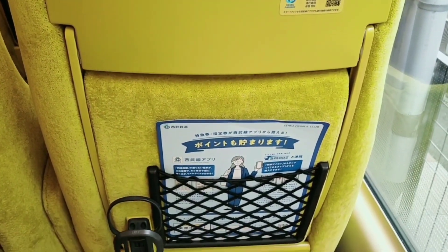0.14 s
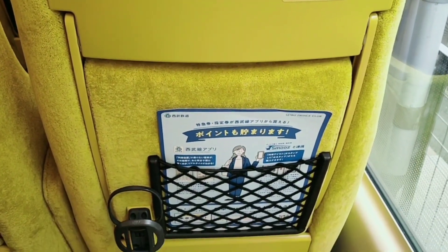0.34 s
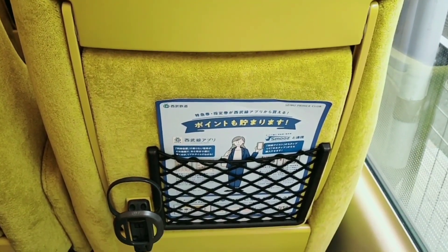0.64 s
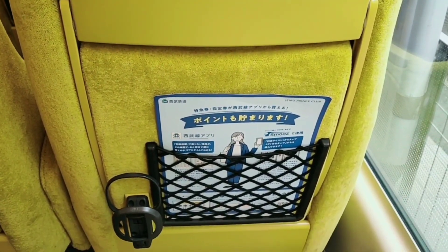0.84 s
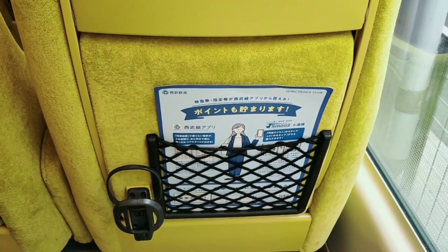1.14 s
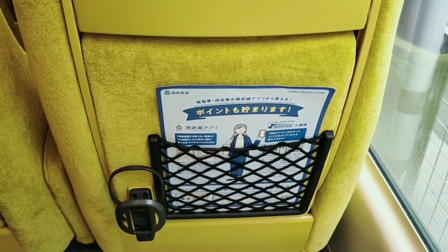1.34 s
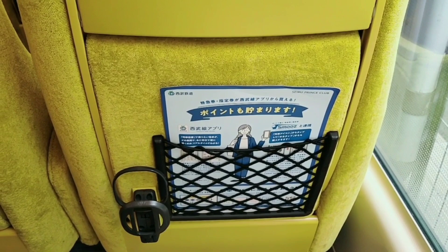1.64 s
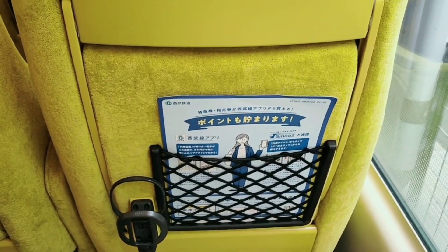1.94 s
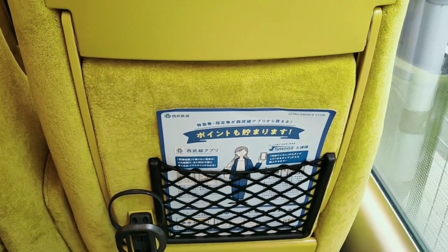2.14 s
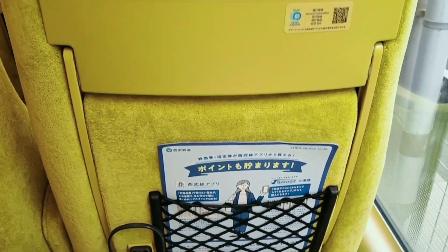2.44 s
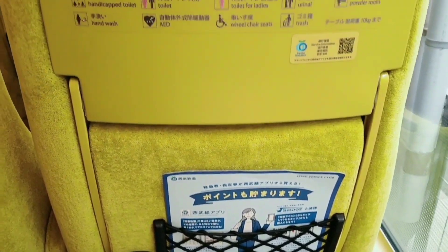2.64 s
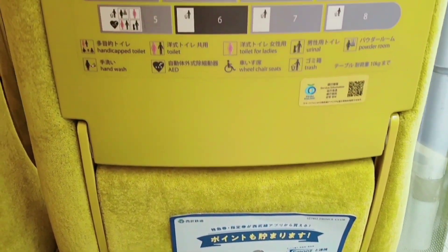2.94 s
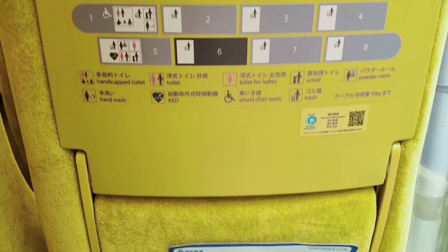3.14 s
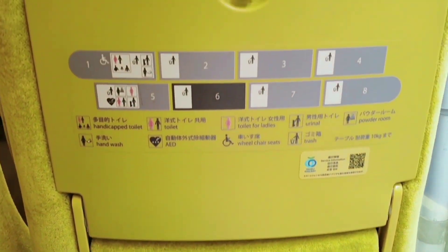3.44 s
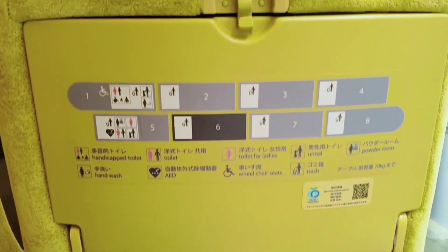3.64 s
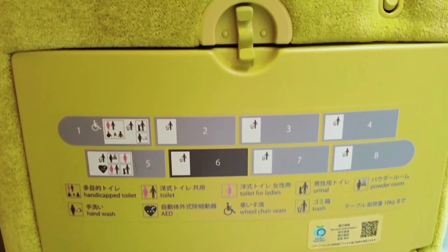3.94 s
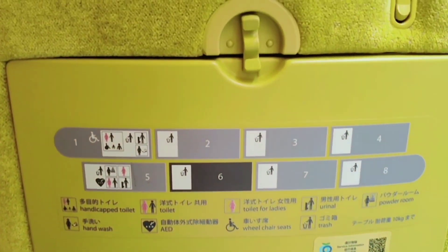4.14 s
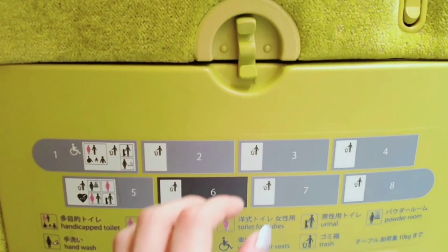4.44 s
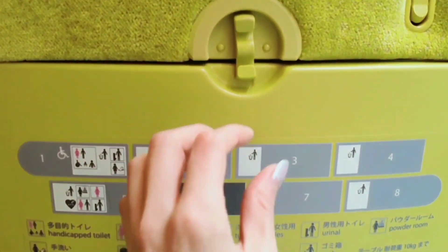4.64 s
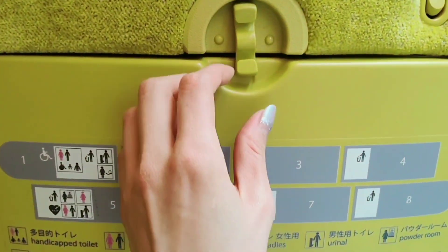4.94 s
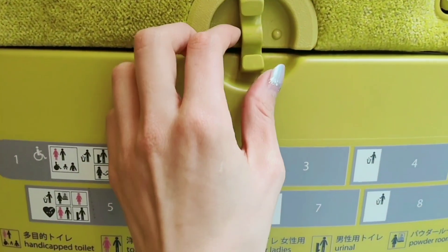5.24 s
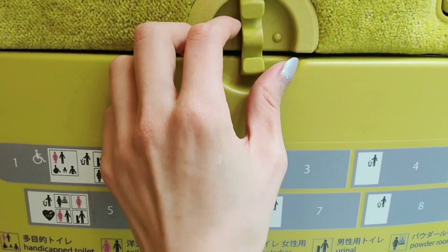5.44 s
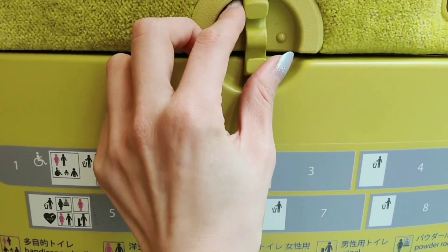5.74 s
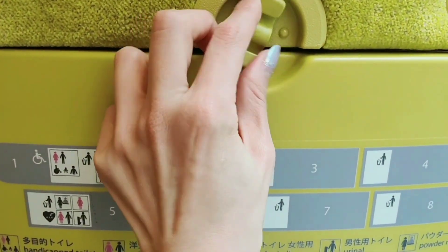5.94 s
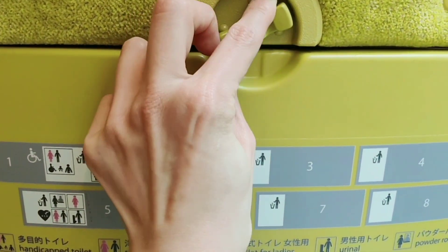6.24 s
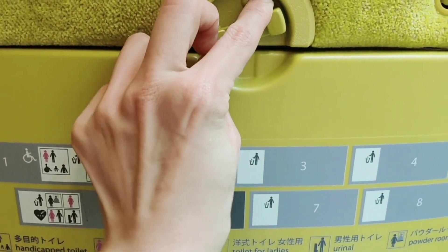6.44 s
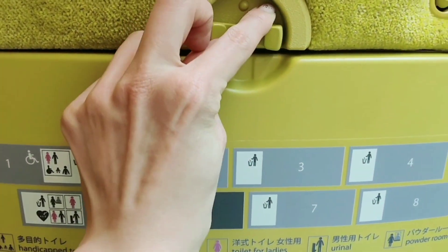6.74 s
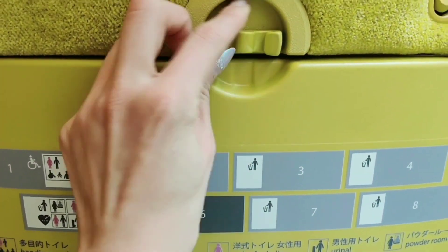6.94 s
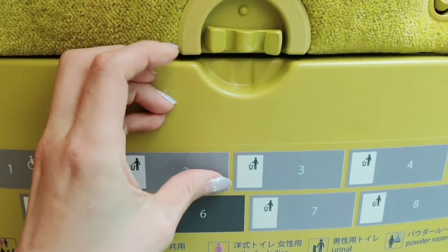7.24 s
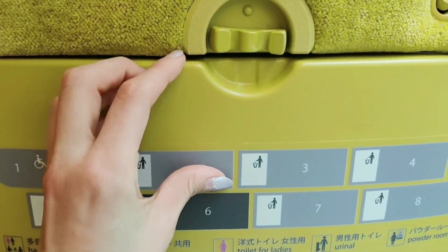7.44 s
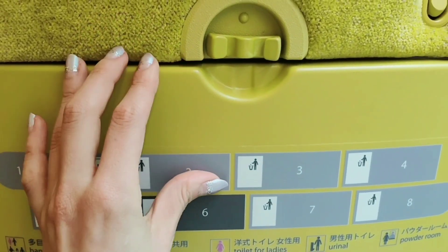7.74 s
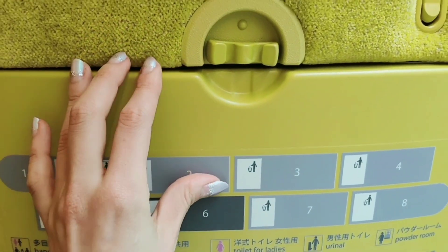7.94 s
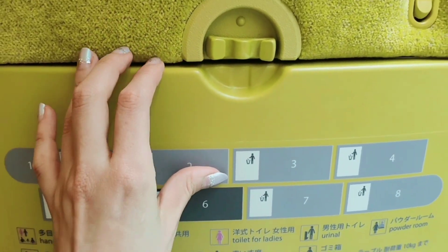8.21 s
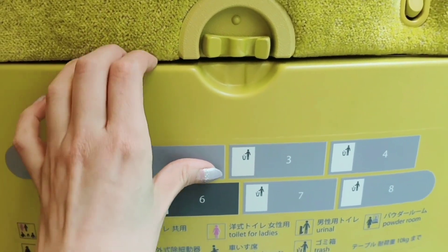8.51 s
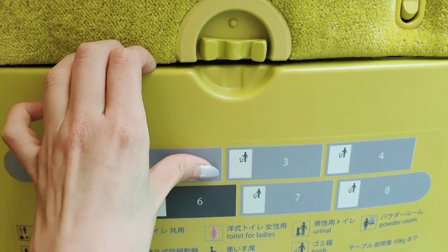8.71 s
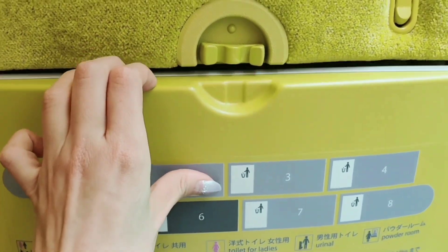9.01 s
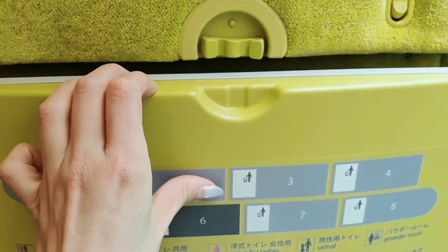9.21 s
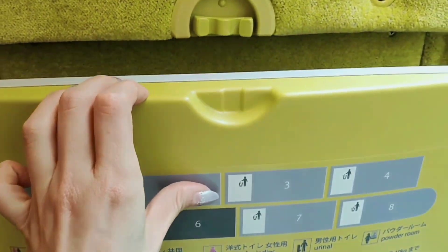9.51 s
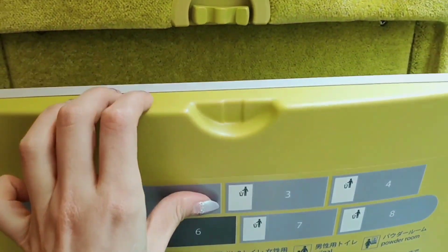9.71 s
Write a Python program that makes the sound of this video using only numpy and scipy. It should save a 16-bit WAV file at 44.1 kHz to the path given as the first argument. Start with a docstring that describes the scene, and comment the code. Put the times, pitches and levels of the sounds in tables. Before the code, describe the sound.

Inside a running train, low rumble and wavering hum; a plastic tray latch clicks and snaps, then soft bumps bring a much louder deep drone.

```python
"""Inside a slowly running express train, with floor rumble, hissing vents, a motor hum and two beating fans.
The microphone rises from a seat pocket to the tray top, and skin brushes briefly over its case.
A hand turns a plastic tray latch until it snaps: decaying modes, clacks, thuds, rattle and nail ticks.
Bumps and crumpling padding follow as the arm meets the seat, then sine orders of the motor drone low and loud.
Hums and rings are sines; rumble, hiss, rub and crumple are shaped noise; the hand gets a short reverberation."""
import sys
import numpy as np
from scipy import signal
from scipy.fft import rfft, irfft
from scipy.io import wavfile

SR = 44100
rng = np.random.default_rng(int(sys.argv[2]) if len(sys.argv) > 2 else 0)


def file_out(sig):
    """Save sig as 16-bit WAV at sys.argv[1]."""
    # one column per channel
    cols = np.atleast_2d(sig).T
    # limit, then scale
    lim = np.clip(cols, -1, 1)
    pcm = np.round(lim * 32767).astype(np.int16)
    wavfile.write(sys.argv[1], SR, pcm)


N = 435266
TIME = np.arange(N) / SR  # seconds
BINS = np.maximum(np.fft.rfftfreq(2 ** 19, 1 / SR), 1)  # Hz, kept above zero for the logarithms

# Ringing modes of the tray and its latch: pitch_hz, level_db against the knock, t60_s
TRAY_MODES = [(930, -10, 0.048), (1270, -2, 0.023), (1510, -13, 0.014), (1820, -15, 0.032),
              (1990, -10, 0.044), (2230, -13, 0.034), (2540, -24, 0.02), (2950, -11.5, 0.036),
              (3080, -11, 0.036), (4200, -19, 0.03), (4970, -12.5, 0.036), (8320, -12, 0.011),
              (13200, -11, .007), (14400, -12, .007)]
# Latch knocks: start_s, level_db, favoured_hz at the point of contact, loss_db an octave away from it
LATCH_KNOCKS = [(5.768, -49, 1590, 9), (5.933, -35, 1270, 40), (5.934, -45, 2200, 12),
                (5.954, -53, 2300, 2.6), (5.975, -46, 3300, 40), (6.051, -62, 8400, 10),
                (6.063, -60, 8400, 10), (6.289, -49, 3000, 6), (6.293, -40.5, 2500, 18),
                (6.309, -47, 2400, 10), (6.543, -31.5, 8000, 3), (6.5439, -29.5, 1230, 5),
                (6.5455, -27.5, 3200, 40)]
# The finger's grip shifts each mode from knock to knock; scale of the shift as a share of its pitch
GRIP_DETUNE = .012
# Each knock starts with a dead clack at its favoured pitch; level against the knock
CLACK_CYCLES, CLACK_DB = 3.3, 9
# Every knock also thuds in the seat back; level against the knock
THUD_HZ, THUD_DB, THUD_T60_S = 393, -3, 0.014
# Clack and thud are strongest at the heavy pitch and lose this much per octave away from it
HEAVY_KNOCK_HZ, LOSS_DB_PER_OCTAVE = 1250, 7.5
# A well-focused knock clacks and rattles less: dB per dB of its octave loss
FOCUS_SOFTENING = 0.48
# Colour of the loose tray's rattle: pitch_hz, width_hz, level_db
RATTLE_COLOUR = [(1000, 400, 1), (1750, 830, 2.5), (3400, 1200, -7), (5100, 700, -14)]
RATTLE_DB, RATTLE_T60_S = -3.5, .1  # level against the knock, ahead of the colour

# Further fingernail ticks on plastic, most between knocks, one on the last knock: start_s, level_db ahead of
# the nail's colour, t60_s
NAIL_TICKS = [(5.876, -49, .015), (6.543, -31.5, .009), (6.6545, -55, .012), (6.907, -54, .012),
              (7.0845, -38, .014), (8.170, -49.5, 0.011)]
# The nail turning the latch ticks at every knock; level ahead of the nail's colour
KNOCK_NAIL_DB, KNOCK_NAIL_T60_S = -53, 0.021
# Resonances of a fingernail: pitch_hz, width_hz, level_db
NAIL_COLOUR = [(2800, 1400, -2.5), (4960, 880, 1.5), (7550, 1500, -6), (14600, 1900, -12.5)]
# Nails and fingers scraping in tiny slips: start_s, length_s, level_db ahead of the nail's colour
NAIL_SCRAPES = [(5.92, .075, -61), (6.09, .05, -66), (8.094, 0.089, -74)]
# Fingertip squeaks on smooth plastic: start_s, length_s, pitch_hz, level_db
FINGER_SQUEAKS = [(6.105, 0.036, 4940, -64.5), (7.762, 0.036, 6860, -69.5), (7.87, 0.052, 5170, -59.5)]
SLIPS_PER_S, SQUEAK_WIDTH_HZ = 780, 380
# Hand strokes over the upholstery: start_s, length_s, level_db
CLOTH_STROKES = [(7.113, 0.64, -66.5), (7.624, 0.47, -71.5)]
# Colour of the rubbed cloth: pitch_hz, width_hz, level_db
CLOTH_COLOUR = [(1300, 600, 0.5), (2480, 800, 2.5)]
HAND_LEFT_DB = 7  # left minus right level of the hand's treble

# Skin brushing the microphone's case: start_s, length_s, level_db per Hz ahead of the case colour
CASE_BRUSHES = [(2.724, .018, -91), (2.732, 0.055, -95), (2.757, 0.01, -91.5), (3.568, .03, -102),
                (3.6, .045, -99)]
# Colour of the case: pitch_hz, width_hz, level_db
CASE_COLOUR = [(3000, 1100, -9), (4950, 600, -2), (7650, 900, -15), (12400, 500, -17), (14800, 800, -14)]

# The arm settling on the seat: start_s, drive_db ahead of the rocking envelope, rocking_hz
ARM_BUMPS = [(7.18, -22, 42), (7.238, -18.5, 52), (7.283, -19, 43), (7.318, -29, 55), (7.364, -24, 48)]
# Padding crumpling under the arm: start_s, length_s, pitch_hz, width_hz, level_db per Hz
PADDING_CRUMPLES = [(7.17, 0.34, 164, 50, -58), (7.17, 0.19, 84, 32, -53), (7.16, 0.11, 260, 60, -65.5),
                    (7.17, .14, 540, 170, -81)]

MOTOR_HZ, FAN_HZ = 58.82, 376.45
# The motor's first two orders through the air
AIRBORNE_FIRST_DB, AIRBORNE_SECOND_DB = -40.4, -50.8
# The arm touches the seat, presses home and rests there
TOUCH_S, SETTLE_S = 7.3, 0.12
# Its pressure eases once, which weakens the drone's second order
EASE_S, EASE_WIDTH_S, EASE_SECOND_DB = 8.82, 0.16, -6
# The seat shakes with the train, so the drone throbs; it sags as the arm relaxes
THROB_HZ, THROB_DB, SAG_DB_PER_S = 8.1, .7, .4
FOURTH_ON_SEAT_DB = -3.5  # change of the fourth order once the arm rests on the seat
# Lead of one fan over the other, which makes their blade tones beat: time_s, lead_cycles
FAN_LEAD_CURVE = [(0, -.4), (.72, .5), (3.4, 3.5), (5.62, 6.5), (7.3, 8.5), (8.57, 10.5), (9.87, 12.3)]
# Nearer fan's blade tone: time_s, level_db
FAN_LEVEL_CURVE = [(0, -52.5), (1.3, -51.5), (1.5, -59.5), (2.4, -58.5), (3.0, -54.5), (6.2, -53.5),
                   (7.6, -55), (9.87, -57.5)]
SECOND_FAN_DB = -6.5  # against the nearer fan
# Whines above the motor: pitch_hz, level_db
MOTOR_WHINES = [(1784, -85), (5266, -90)]

# Running noise of the carriage: pitch_hz, level_db per Hz
RUMBLE_SPECTRUM = [(18, -69), (40, -62), (72, -63.5), (95, -69.5), (135, -66.5), (200, -68.5), (250, -79),
                   (380, -73.5), (520, -83.5), (680, -87), (1000, -90), (1650, -98), (2400, -101),
                   (4000, -122)]
# Wall-panel resonances that colour the rumble: pitch_hz, width_hz, level_db per Hz
PANEL_RESONANCES = [(776, 61, -86.5), (1003, 23, -89), (1110, 32, -92.5), (1234, 84, -89.5),
                    (1380, 130, -95)]
# Standing wave between the seat rows: pitch_hz, width_hz, level_db per Hz ahead of its height gain
SEAT_WAVE = [(303, 98, -73)]
# Higher standing wave, strong where the first is weak: pitch_hz, width_hz, level_db per Hz ahead of its gain
UPPER_SEAT_WAVE = [(385, 104, -84)]
# Gain of the higher wave, dropping as the microphone leaves the pocket: time_s, gain_db
UPPER_SEAT_WAVE_GAIN = [(0, 6), (3.15, 10.5), (3.5, -3), (6.6, -1), (7.2, -9)]
# Air from the vents: pitch_hz, level_db per Hz ahead of the height gain
AIR_SPECTRUM = [(800, -110), (2300, -100.5), (3300, -105), (3800, -110), (4500, -108), (5600, -111),
                (6400, -117), (7400, -122), (9000, -123), (14500, -123)]
# Vent-grille resonances: pitch_hz, width_hz, level_db per Hz ahead of the height gain
GRILLE_RESONANCES = [(2960, 120, -106), (4910, 230, -105), (5280, 350, -104)]
PORT_LAG_S = .000385  # the left port hears the direct hiss this much later
# Likeness of the two ports in diffuse noise: pitch_hz, likeness from -1 to 1
PORT_LIKENESS = [(60, 0.99), (99, 1), (160, 0.97), (270, 0.99), (450, 0.49), (740, 0.58), (1220, -0.58),
                 (2010, 0.079), (3330, 0.21), (5500, -0.04), (9080, -0.23), (15000, 0.21)]
# Balance of diffuse noise: pitch_hz, left_minus_right_db
PORT_BALANCE = [(60, 1), (99, 4.5), (160, 0.5), (270, 3.5), (450, -1), (740, 0), (1220, 3), (2010, 3.5),
                (3330, 3), (5500, 8.5), (9080, -1.5), (15000, 2)]

# The microphone rises from the pocket to the top of the tray, through the standing waves
RISE_START_S, RISE_S = 2.32, 2.9
# Gains that follow its height: pocket_db, tray_db
RUMBLE_GAIN_DB, SEAT_WAVE_GAIN_DB, AIR_GAIN_DB = (0, -0.76), (-9, 2.5), (-2, -2.5)
FOURTH_ORDER_DB = (-62.5, -51.5)  # level of the motor's fourth order: pocket_db, tray_db
CUTOFF_HZ = 15750


def latch():
    """Each contact excites the tray's modes, most near its favoured pitch, plus a clack, thud and rattle."""
    t = TIME[:SR // 8]
    rings, rattles, blows = np.zeros((2, N)), np.zeros((2, N)), np.zeros(N)
    for s, knock_db, favoured_hz, focus_db in LATCH_KNOCKS:
        for k, (hz, mode_db, t60) in enumerate(TRAY_MODES):
            focus_loss_db = focus_db * np.log2(hz / favoured_hz) ** 2
            strength_db = knock_db + mode_db - focus_loss_db + .7 * rng.standard_normal()
            gripped_hz = hz * (1 + GRIP_DETUNE * rng.uniform(-1.2, 1))
            # the ports hear each mode in a different phase; the treble leans to the left
            port_phase = np.array([[0], [(-1) ** k * 1.06]])
            mode = np.sin(2 * np.pi * gripped_hz * t + port_phase)
            mode = mode * pan(HAND_LEFT_DB if hz > 1900 else -1.8)
            add(rings, s, decay(t, strength_db, t60) * mode)
        broad_db = knock_db - FOCUS_SOFTENING * focus_db
        weight_loss_db = LOSS_DB_PER_OCTAVE * abs(np.log2(favoured_hz / HEAVY_KNOCK_HZ))
        burst = np.sin(np.pi * np.minimum(favoured_hz * t / CLACK_CYCLES, 1)) ** 2
        clack = burst * np.sin(2 * np.pi * favoured_hz * t)
        add(blows, s, from_db(broad_db + CLACK_DB - weight_loss_db) * clack)
        thud = np.sin(2 * np.pi * THUD_HZ * t)
        add(blows, s, decay(t, knock_db + THUD_DB - weight_loss_db, THUD_T60_S) * thud)
        rattle = rng.standard_normal((2, len(t)))
        add(rattles, s, decay(t, broad_db + RATTLE_DB, RATTLE_T60_S) * rattle)
    # the small tray radiates little below its first mode
    weak_bass = signal.butter(2, 600, "high", fs=SR, output="sos")
    tray = rings + resonate(rattles, RATTLE_COLOUR) * pan(3)
    return blows + signal.sosfilt(weak_bass, tray)


def fingers():
    """Decaying noise ticks and sparse slips ring the nail; narrow noise squeaks and broad noise rubs on cloth."""
    t = TIME[:SR // 8]
    scratches, squeaks = np.zeros((2, N)), np.zeros((2, N))
    knock_ticks = [(knock[0], KNOCK_NAIL_DB, KNOCK_NAIL_T60_S) for knock in LATCH_KNOCKS]
    for s, db, t60 in NAIL_TICKS + knock_ticks:
        add(scratches, s, decay(t, db, t60) * rng.standard_normal((2, len(t))))
    slip_moments = rng.random(N) < SLIPS_PER_S / SR
    slips = rms_one(slip_moments * rng.standard_normal((2, N)))
    scratches += slips * strokes(NAIL_SCRAPES)
    for s, length, hz, db in FINGER_SQUEAKS:
        pitch = [(hz, SQUEAK_WIDTH_HZ, 0)]
        squeak = resonate(rng.standard_normal((2, len(t))), pitch)
        squeak = rms_one(resonate(squeak, pitch))
        add(squeaks, s, from_db(db) * squeak * np.sin(np.pi * np.minimum(t / length, 1)))
    cloth = rms_one(diffuse(humps(CLOTH_COLOUR)))
    rub = cloth * strokes(CLOTH_STROKES) * from_db(4.1 * drift(30))
    return resonate(scratches, NAIL_COLOUR) * pan(HAND_LEFT_DB) + squeaks + rub


def grip():
    """Skin sliding over the microphone's case makes a smooth, bright hiss, separate at each port."""
    hiss = np.array([noise(humps(CASE_COLOUR)), noise(humps(CASE_COLOUR))])
    return hiss * strokes(CASE_BRUSHES) * pan(HAND_LEFT_DB)


def bumps():
    """Soft blows rock the padded seat back in damped low sines, while noise crumples the padding."""
    t = TIME[:SR // 3]
    blows = np.zeros(N)
    for s, db, hz in ARM_BUMPS:
        soft_start = 1 - np.exp(-t / 0.007)
        rock = -np.sin(2 * np.pi * hz * t) * decay(t, 0, 0.11) * soft_start
        add(blows, s, from_db(db) * lowpass(2.0 * rock, 300))
    crumple = 0
    for s, length, hz, width, db in PADDING_CRUMPLES:
        crumple = crumple + noise(humps([(hz, width, db)])) * swell(s, length)
    return (blows + crumple * from_db(2 * drift(35))) * pan(2.3)


def machines():
    """Motor orders and two beating fans hum in air; contact adds a solid-borne drone through the seat."""
    motor, fan = turning(MOTOR_HZ, 0.14), turning(FAN_HZ, 0.38)
    first = from_db(AIRBORNE_FIRST_DB + drift(4)) * np.cos(motor)
    second = from_db(AIRBORNE_SECOND_DB + 2.3 * drift(4)) * np.sin(2 * motor + .7 * drift(4))
    since_touch = TIME - TOUCH_S
    contact = np.clip(since_touch / SETTLE_S, 0, 1)
    eased = np.exp(-((TIME - EASE_S) / EASE_WIDTH_S) ** 2)
    throb_db = THROB_DB * np.cos(2 * np.pi * THROB_HZ * since_touch)
    pressure = contact * from_db(throb_db - SAG_DB_PER_S * since_touch)
    # in the seat the first two orders peak together: one sharp pull in every turn
    seat_first = from_db(-28.0 + 0.27 * drift(5)) * np.cos(motor)
    seat_second = from_db(-32.5 + EASE_SECOND_DB * eased + 1.0 * drift(8.7)) * np.cos(2 * motor)
    seat_third = from_db(-55.5) * np.cos(3 * motor)
    drone = pressure * (seat_first + seat_second + seat_third)
    fourth_db = with_height(*FOURTH_ORDER_DB) + FOURTH_ON_SEAT_DB * contact + 1.6 * drift(2.5)
    fourth = from_db(fourth_db) * np.cos(4 * motor)
    fan_db, = in_time(FAN_LEVEL_CURVE)
    half_lead = np.pi * in_time(FAN_LEAD_CURVE)[0]  # radians
    pair = np.cos(fan + half_lead) + from_db(SECOND_FAN_DB) * np.cos(fan - half_lead)
    blades = from_db(fan_db + .7 * drift(2.5)) * pair
    blades = blades + from_db(-73.5 + 2 * drift(5)) * np.cos(2 * fan)
    whines = sum(from_db(db + 2 * drift(3)) * np.cos(turning(hz, 4)) for hz, db in MOTOR_WHINES)
    # the root of two makes each sine's level an RMS level
    return np.sqrt(2) * (fourth + blades + whines - first - second - drone) * pan(1.7)


def carriage():
    """Wheel rumble, standing waves between the seats and vent air, all as shaped noise."""
    below_hearing = 1 / np.sqrt(1 + (14 / BINS) ** 4)
    above_rumble = 1 / (1 + (BINS / 7000) ** 4)
    colour = np.hypot(from_db(at_hz(RUMBLE_SPECTRUM)), humps(PANEL_RESONANCES))
    rumble = diffuse(colour * below_hearing * above_rumble)
    rumble = rumble * from_db(with_height(*RUMBLE_GAIN_DB) + 0.93 * drift(12))
    lower_wave = diffuse(humps(SEAT_WAVE)) * from_db(with_height(*SEAT_WAVE_GAIN_DB))
    upper_wave = diffuse(humps(UPPER_SEAT_WAVE)) * from_db(in_time(UPPER_SEAT_WAVE_GAIN)[0])
    air = diffuse(np.hypot(from_db(at_hz(AIR_SPECTRUM)), humps(GRILLE_RESONANCES)))
    # part of the hiss comes straight from the window side and reaches the right port first
    direct = noise(from_db(at_hz(AIR_SPECTRUM) - 5.5))
    air = air + np.array([np.roll(direct, round(PORT_LAG_S * SR)), direct])
    air = air * from_db(with_height(*AIR_GAIN_DB) + 1.4 * drift(27))
    return rumble + lower_wave + upper_wave + air


def cabin(x):
    """Padded seats return a short, dull reverberation: a decaying, low-passed noise tail of unit energy."""
    t = TIME[:SR // 3]
    tail = lowpass(rng.standard_normal((2, len(t))), 3800)
    tail = tail * decay(t, 0, .17) * (t > .003)
    return signal.fftconvolve(x, rms_one(tail) / np.sqrt(len(t)), axes=1)[:, :N]


def turning(hz, wander_hz):
    """Phase of a rotor whose speed wanders slightly."""
    return 2 * np.pi * np.cumsum(hz + wander_hz * drift(3.37)) / SR


def with_height(pocket_db, tray_db):
    """A level that follows the microphone's smooth rise from pocket to tray."""
    height = np.sin(np.pi / 2 * np.clip((TIME - RISE_START_S) / RISE_S, 0, 1))
    return pocket_db + (tray_db - pocket_db) * height


def strokes(rows):
    """Summed gain of swelling strokes."""
    return sum(from_db(db) * swell(s, length) for s, length, db in rows)


def swell(s, length):
    """A half-sine envelope that starts at time s."""
    return np.sin(np.pi * np.clip((TIME - s) / length, 0, 1))


def decay(t, level_db, t60):
    """Gain that falls 60 dB in t60 seconds."""
    return from_db(level_db - 60 * t / t60)


def diffuse(gain):
    """Noise from all round, with frequency-dependent likeness and balance of the two ports."""
    alike = np.clip(at_hz(PORT_LIKENESS), -.999, .999)
    left = from_db(at_hz(PORT_BALANCE) / 2)
    size = 2 * len(BINS) - 2
    mid = rfft(noise(gain * np.sqrt((1 + alike) / 2)), size)
    side = rfft(noise(gain * np.sqrt((1 - alike) / 2)), size)
    return irfft([(mid + side) * left, (mid - side) / left])[:, :N]


def noise(gain):
    """Noise with the given amplitude per root hertz."""
    real, imaginary = rng.standard_normal((2, len(BINS)))
    return irfft(gain * (real + 1j * imaginary) * np.sqrt(SR * len(BINS) / 2))[:N]


def drift(rate_hz):
    """Slow random wander with unit RMS."""
    return rms_one(noise(1 / (1 + (BINS / rate_hz) ** 2)))


def humps(resonances):
    """Summed gain of bell-shaped resonances over frequency."""
    return sum(from_db(db) / (1 + ((BINS - hz) / width * np.sqrt(2)) ** 2) for hz, width, db in resonances)


def resonate(x, resonances):
    """Parallel two-pole resonances with alternating signs."""
    out = 0
    for k, (hz, width, db) in enumerate(resonances):
        r = np.exp(-np.pi * width / SR)  # pole radius
        numerator = [(1 - r * r) / 2, 0, (r * r - 1) / 2]
        denominator = [1, -2 * r * np.cos(2 * np.pi * hz / SR), r * r]
        # the tiny offset avoids slow denormal numbers
        out = out + (-1) ** k * from_db(db) * signal.lfilter(numerator, denominator, x + 1e-18)
    return out


def lowpass(x, hz, order=2):
    """Butterworth low-pass."""
    return signal.sosfilt(signal.butter(order, min(hz, .45 * SR), fs=SR, output="sos"), x)


def in_time(rows):
    """Each column of a curve at every sample."""
    s, *columns = np.transpose(rows)
    return [np.interp(TIME, s, column) for column in columns]


def at_hz(points):
    """A spectrum table at every frequency, interpolated over log pitch."""
    hz, value = np.transpose(points)
    return np.interp(np.log(BINS), np.log(hz), value)


def pan(left_db):
    """Gains of the two channels for a left-minus-right level in dB."""
    return from_db(np.array([[left_db], [-left_db]]) / 2)


def add(track, s, sound):
    """Mix a sound in from time s."""
    at = round(s * SR)
    track[..., at:at + sound.shape[-1]] += sound[..., :N - at]


def from_db(db):
    """Decibels to gain."""
    return 10 ** (np.asarray(db) / 20)


def rms_one(x):
    """Scale to unit power."""
    return x / np.sqrt(np.mean(x ** 2) + 1e-20)


def scene():
    """The hand close to the microphone, with the seat, machines and carriage around it."""
    hand = latch() + fingers()
    room = from_db(-20.5) * cabin(hand)
    return hand + room + grip() + bumps() + machines() + carriage()


def record(dry):
    """A steep elliptic low-pass cuts the top."""
    return signal.sosfilt(signal.ellip(10, .1, 80, CUTOFF_HZ, fs=SR, output="sos"), dry)


dry = scene()
out = record(dry)
file_out(out)
```